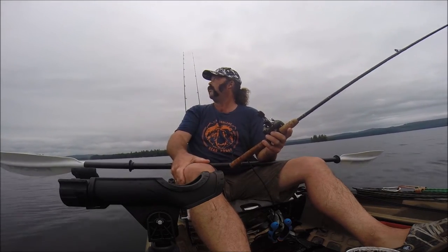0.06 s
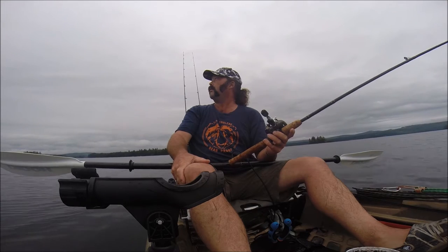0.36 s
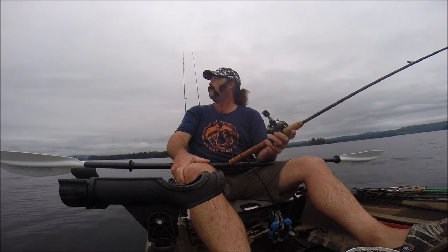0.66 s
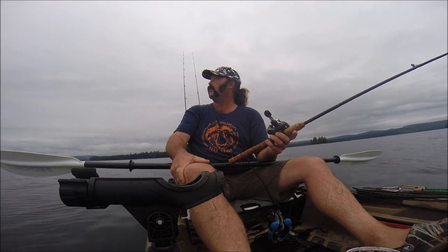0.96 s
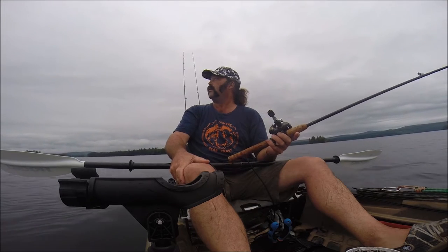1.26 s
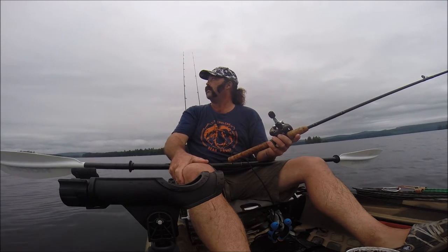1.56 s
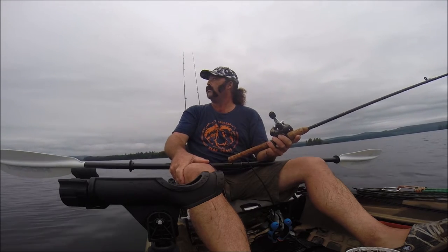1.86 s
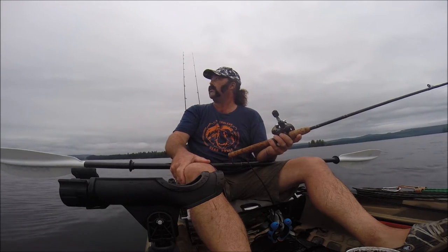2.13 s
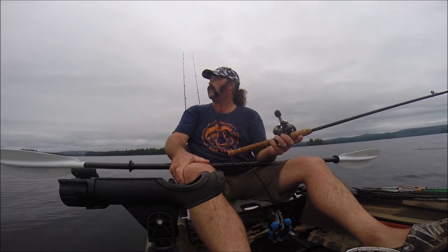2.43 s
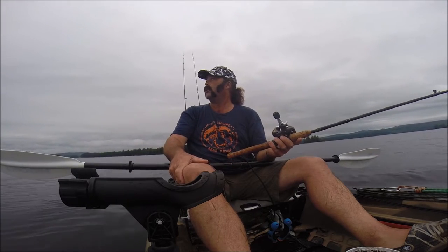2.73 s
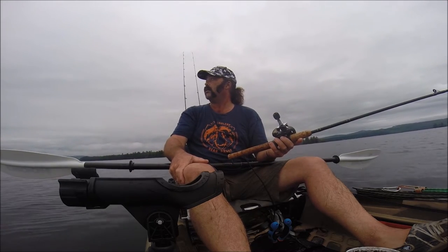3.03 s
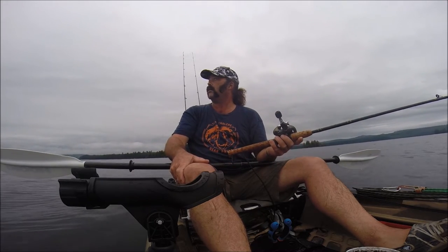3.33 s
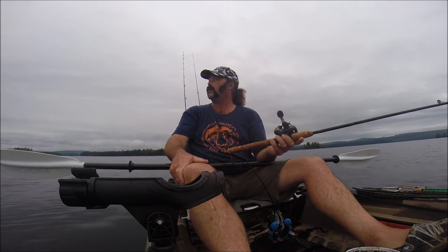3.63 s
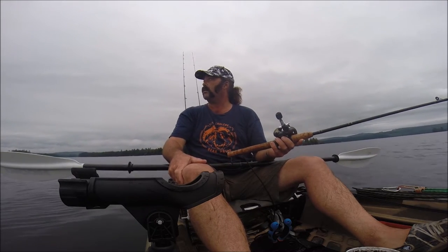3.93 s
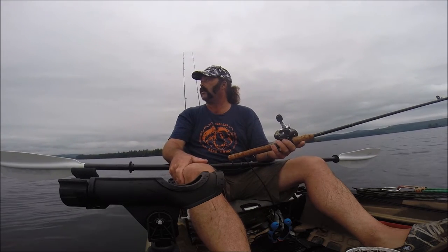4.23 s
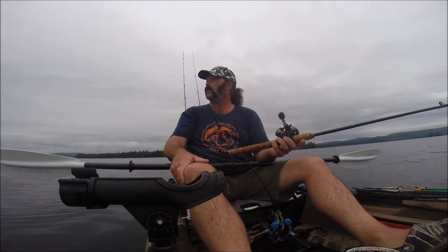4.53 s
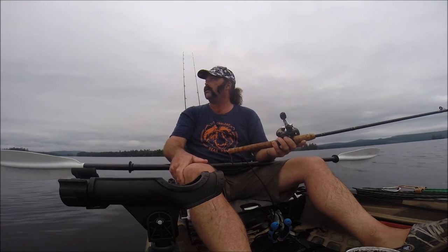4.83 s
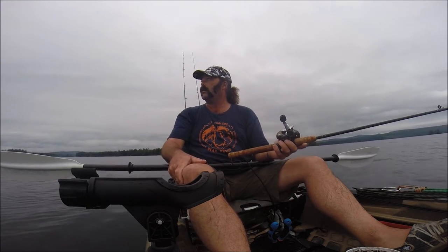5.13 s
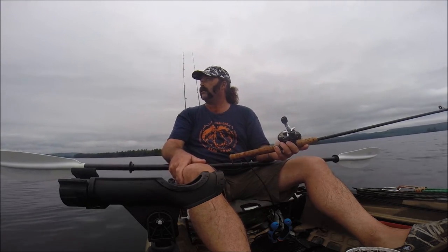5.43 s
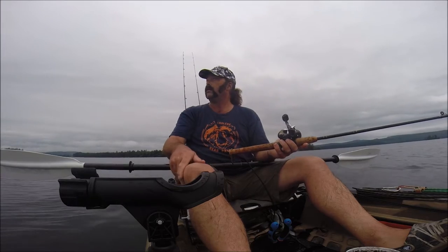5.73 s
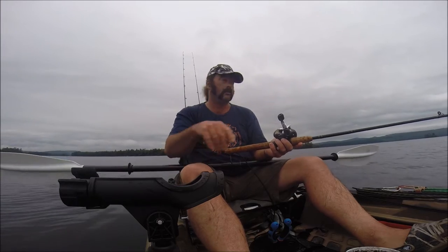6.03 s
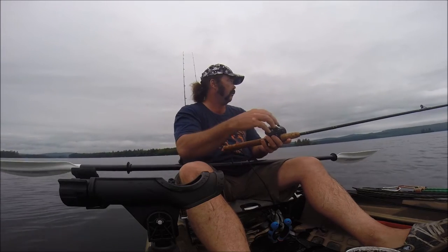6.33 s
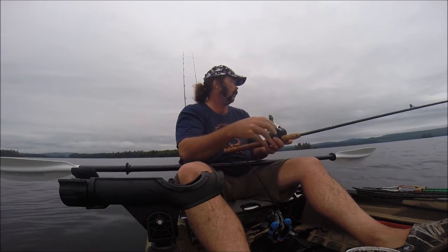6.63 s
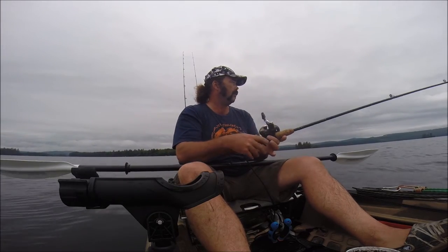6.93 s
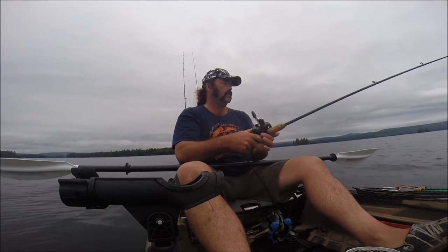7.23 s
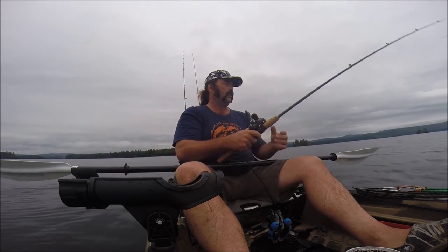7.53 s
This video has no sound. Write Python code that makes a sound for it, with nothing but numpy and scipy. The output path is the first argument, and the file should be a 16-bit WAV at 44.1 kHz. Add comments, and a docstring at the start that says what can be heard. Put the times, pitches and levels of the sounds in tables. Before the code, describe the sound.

A loon's clear, wavering call opens at once over a calm lake, with a faint, dull echo off the shore. A second strong call follows at 1 second, then softer ones near 2, 3, 4.3 and 5.6 seconds, while another loon answers with hoarse low notes and yelps. The calls end at about 6.2 seconds. A fishing reel clicks sharply at 0.5 and 1.5 seconds, and more softly at 6.4. A distant bird chirps very faintly around 2.5 seconds. The hollow kayak hull is bumped softly near 5.2, 6.2 and 7.2 seconds, and the reel whirs faintly from about 6 seconds to the end, near 7.7. Throughout, wind buffets the microphone with low rumble and thumps, surging near 2, 3.3 and 4.3 seconds. Almost everything is on the right; the left carries mostly light hiss.

```python
"""From a kayak on a calm lake, a loon's wavering call is heard at once, echoing off the shore.
A fishing reel clicks, and a second loon trades calls with the first, amid low notes and yelps.
Near 2.5 s a small bird chirps far off. After 5 s the hull is bumped, the reel whirs and the calls end.
All along, a breeze buffets the right microphone. The left one is all but dead:
it gives hiss, a faint whine and a trace of the wind and the other sounds."""
import sys
import numpy as np
from scipy import signal
from scipy.fft import rfft, irfft
from scipy.io import wavfile
from scipy.ndimage import uniform_filter1d

SR = 44100
rng = np.random.default_rng(int(sys.argv[2]) if len(sys.argv) > 2 else 0)


def digitize_waveform(pressure):
    """Quantize a signal to 16-bit integers and store it at the path in sys.argv[1].

    Rows of a 2-D input are taken as channels; values are limited to [-1, 1].
    """
    field = np.atleast_2d(pressure).T
    bounded = np.clip(field, -1, 1)
    quanta = np.round(bounded * 32767).astype(np.int16)
    wavfile.write(sys.argv[1], SR, quanta)


N = 338688
TIME = np.arange(N) / SR


def loon_calls():
    """Two loons sing clear, wavering calls (tremolos), with hoarse low notes and yelps around them."""
    # Each row: start, end and delay to a crest (a top of the waver) in seconds, wavers per second,
    # crest pitch and dip depth in Hz, tiring time in seconds, then in dB: level, opening swell,
    # closing fade, softening in the dips, treble, treble at the end.
    tremolos = [(-.02, 0.651, 0.091, 11.3, 1181, 127.2, 0.32, -26.5, 8.5, 24, 11, 4, -10),
                (0.998, 1.666, .057, 11.38, 1180, 122.7, .36, -30.5, 13, 28.5, 13, 4.5, 10),
                (1.884, 2.58, .027, 9.67, 1182, 170, .14, -44, 0, 5, 3, -20, -20),
                (3.102, 3.793, .01, 11.4, 1177, 106, 0.13, -38, 2.5, 13.5, 3, -21, -21),
                (4.298, 4.984, .046, 11.18, 1166, 104.2, .2, -36.5, 9.5, 7.5, 2, -17, -21),
                (5.568, 6.23, 0.018, 10.45, 1142, 121.8, 0.16, -40.7, 2, 10.5, 1.5, -23, -23)]
    # Low notes lead into a call or answer it. Each row: start, end and delay to a crest in seconds,
    # wavers per second, crest pitch, dip depth, glide and final lift in Hz, level, fade and treble in dB.
    low_notes = [(0.56, 0.664, 0.021, 7.9, 689, 46, 0, 0, -59, -5, -13),
                 (.652, 0.74, .038, 11.4, 933, 250, 0, 0, -56.5, 0, -10),
                 (0.728, 0.899, 0.081, 8.4, 885, 206.3, 1, 140, -55.5, 0.5, -10),
                 (0.956, 1.047, .071, 7.3, 902, 204, -2, -2, -41.5, 30, -8),
                 (1.048, 1.268, 0.071, 9.25, 733, 80.6, -72, -4, -55, -2, -2),
                 (1.773, 1.894, 0.052, 12.2, 754, 75, 2, 94, -54, 6, -19),
                 (2.028, 2.097, .031, 7.6, 760, 83, 0, 0, -53, 1, -20),
                 (2.237, 2.507, 0.093, 10.2, 734, 87.6, -24, 0, -58, -1, -21),
                 (2.981, 3.116, 0.039, 11.8, 711, 61.7, -1, 138, -54.5, -2, -22),
                 (3.163, 3.243, 0.081, 6.1, 896, 224, 0, 0, -53.5, 7, -22),
                 (3.289, 3.34, .063, 6.5, 890, 192, 0, 0, -51.5, 15, -24),
                 (3.495, 3.698, 0.046, 9.3, 747, 96.2, -115, 0, -55.5, -1.5, -14),
                 (4.2, 4.48, .054, 9.9, 751, 79, 24.5, 225, -49, 2.5, -13),
                 (4.517, 4.677, 0.05, 8.2, 796, 154.7, 0, 120, -48.5, 2.5, -17),
                 (4.737, 4.845, 0.06, 8.2, 698, 96.6, -2, 0, -52, -3, -18),
                 (5.53, 5.58, 0.059, 6.7, 759, 165, 0, 0, -57.5, -5, -22)]
    # Each row: start, end and delay to a crest in seconds, crest pitch in Hz, level in dB.
    yelps = [(0.892, 0.963, 0.0103, 1190, -45), (2.104, 2.277, .037, 1108, -47.5),
             (3.238, 3.287, .002, 1090, -50), (3.338, 3.495, 0.00093, 1150, -43),
             (4.482, 4.526, .001, 1085, -46), (4.68, 4.742, .003, 1183, -44.5)]
    clear = [tremolo(*row) for row in tremolos]
    rough = [low_note(*row) for row in low_notes] + [yelp(*row) for row in yelps]
    return (loon_voice(clear, jitter=0.0018, shimmer_db=1.55)
            + loon_voice(rough, jitter=0.011, shimmer_db=2.0))


def tremolo(start, end, crest_s, rate, crest_hz, dip_hz, tiring_s, level_db, swell_db, fade_db,
            throb_db, treble_db, end_treble_db, tired_hz=957, lag_turns=0.2):
    """A full call is loudest on its crests, and sinks and slows as the bird tires."""
    t, progress = span(start, end)
    tired = np.clip(1 - (end - t) / tiring_s, 0, 1) ** 2
    turns = (t - start - crest_s) * rate - lag_turns * tired
    pitch = (crest_hz - dip_hz * dips(turns)) * (1 - tired) + tired_hz * tired
    early, late = (1 - progress) ** 3, progress ** 3
    softening_db = throb_db * dips(turns, linger=1.48) * (1 - tired)
    loud_db = level_db - swell_db * early - fade_db * late - softening_db
    return t, pitch, loud_db, treble_db + (end_treble_db - treble_db) * late


def low_note(start, end, crest_s, rate, crest_hz, dip_hz, glide_hz, lift_hz, level_db, fade_db,
             treble_db, lift_s=0.018, push_db=2.5, steep_hz_per_s=5000):
    """A low note is louder as it climbs, softer as it falls; the voice may break upward at the end."""
    t, progress = span(start, end)
    wavering_hz = crest_hz - dip_hz * dips((t - start - crest_s) * rate)
    pitch = wavering_hz + glide_hz * (progress - 0.5) + lift_hz * np.exp((t - end) / lift_s)
    climbing = np.tanh(np.gradient(pitch) * SR / steep_hz_per_s)
    return t, pitch, level_db - fade_db * progress ** 2 + push_db * climbing, treble_db


def yelp(start, end, crest_s, crest_hz, level_db, wavers_per_s=11, dip_hz=149.3, throb_db=6.5,
         treble_db=-23):
    """The answering bird breaks into its high voice for a scrap of tremolo."""
    t, _ = span(start, end)
    dip = dips((t - start - crest_s) * wavers_per_s)
    return t, crest_hz - dip_hz * dip, level_db - throb_db * dip, treble_db


def dips(turns, linger=1.3):
    """The waver: 0 on a crest, where the voice lingers, 1 in a dip."""
    return ((1 - np.cos(2 * np.pi * turns)) / 2) ** linger


def loon_voice(notes, jitter, shimmer_db, fade_db=4.5):
    """The voice trembles slightly in pitch (jitter) and in strength (shimmer)."""
    tremble = jitter * drift(160)
    fading_db = fade_db * np.array([drift(19) for _ in range(6)])
    return sum(loon_note(*note, tremble, fading_db) for note in notes) * from_db(shimmer_db * drift(39))


def loon_note(t, pitch, loud_db, treble_db, tremble, fading_db, easy_db=-52,
              attack_s=0.011, release_s=0.016):
    """One nearly pure note, made of partials: sine waves at 1 to 6 times its pitch."""
    # How strong a partial is. Each row: frequency in Hz, relative level in dB.
    voice_colour = [(600, -2), (750, -18), (900, -9), (1020, -9), (1180, 9), (1300, -4), (1560, -14.5),
                    (1750, -12), (2050, -26.5), (2300, -21), (3000, -37.5), (3250, -29.5), (3600, -27),
                    (4000, -24), (4300, -25), (4750, -32.5), (5200, -50)]
    samples = np.rint(t * SR).astype(int)
    partial_hz = np.arange(1, 7)[:, None] * pitch * (1 + tremble[samples])
    # Overtones are strong only when the bird faces the boat; each fades on its own over the water.
    high_db = (treble_db + fading_db[:, samples]) * np.clip((partial_hz - 1700) / 400, 0, 1)
    # A low note, when pushed, gains in its octave rather than in its lowest partial.
    low_db = (easy_db - loud_db) * np.clip((1000 - partial_hz) / 150, 0, 1)
    gains = from_db(at_hz(voice_colour, partial_hz) + high_db + low_db)
    gains *= partial_hz < voice_colour[-1][0]
    gains /= np.sqrt(np.sum(gains ** 2, axis=0) / 2)
    voice = np.sum(gains * np.sin(2 * np.pi * np.cumsum(partial_hz, axis=1) / SR), axis=0)
    ramp = np.clip(np.minimum((t - t[0]) / attack_s, (t[-1] - t) / release_s), 0, 1)
    out = np.zeros(N)
    out[samples] = voice * np.sin(np.pi / 2 * ramp) ** 2 * from_db(loud_db)
    return out


def shore(x, ring_s=2.5, build_s=0.085):
    """The wooded shore scatters back a long, dull echo."""
    echo = rng.standard_normal(N) * from_db(-60 * TIME / ring_s) * (1 - np.exp(-TIME / build_s))
    dull = signal.sosfilt(signal.butter(2, [950, 1900], "band", fs=SR, output="sos"), x)
    return signal.fftconvolve(dull, echo / np.linalg.norm(echo))[:N]


def wind(rumble_gain_db=5.5, flutter_gain_db=4.0, lumps_db=3.5, tear_db=-17.5, tear_growth=1.2):
    """Air swirls at the microphone: a deep rumble, a lumpy flutter in the gusts and a few sharp blows."""
    # Each row of these three: frequency in Hz, relative level in dB.
    rumble_colour = [(8.8, -23), (15, 0.5), (48, 2), (78, -3.5), (140, -19.5), (180, -63), (310, -120)]
    flutter_colour = [(70, -9), (110, 3), (150, -2), (200, -10), (300, -22.5), (450, -38.5), (700, -43)]
    tear_colour = [(150, -8), (230, -16), (350, -11), (550, -16), (1000, -34)]
    rumble_db, flutter_db = gusting()
    rumble = from_db(rumble_db + rumble_gain_db) * evened(noise(rumble_colour), span_s=0.0655)
    lumpy_db = flutter_db + lumps_db * drift(21)
    flutter = from_db(lumpy_db + flutter_gain_db) * evened(noise(flutter_colour), span_s=0.0504)
    # Fine swirls grow faster than the gust, so only hard gusts sound bright.
    tearing = from_db(tear_db + tear_growth * lumpy_db) * noise(tear_colour)
    return rumble + flutter + tearing + eddies()


def gusting(lull_flutter_db=-63, attack_s=0.016, release_s=0.024, surge_s=0.029):
    """Breeze, gusts and surges add in power, giving the relative dB of rumble and flutter over time."""
    # The breeze between gusts. Each row: time in seconds, rumble in dB.
    breeze = [(0, -48.5), (.7, -53.5), (1.15, -46), (1.9, -49), (2.6, -56.5), (3.05, -41), (4.2, -51.5),
              (4.55, -47.5), (5.0, -48), (5.8, -49), (6.3, -36), (6.6, -47), (7.68, -38.5)]
    # Gusts rise fast, hold and die away. Each row: start and end in seconds, rumble and flutter in dB.
    gusts = [(0.134, .26, -40.5, -58), (0.365, .45, -37.5, -52.5), (0.967, 0.971, -34, -46.5),
             (1.278, 1.624, -37.5, -51), (1.666, 1.811, -37, -48.5), (1.846, 1.93, -35, -57),
             (1.94, 2.065, -33, -39.5), (2.13, 2.246, -31.5, -40), (2.503, 2.516, -37, -53.5),
             (2.722, 2.85, -33.5, -48.5), (2.922, 3.017, -38, -57), (3.035, 3.134, -36, -36),
             (3.237, 3.431, -35.5, -43), (3.528, 3.65, -40.5, -52.5), (3.708, 3.777, -33, -37),
             (3.924, 3.989, -31.5, -46), (4.052, 4.14, -33, -49), (4.253, 4.381, -32, -39),
             (4.674, 4.872, -36, -42.5), (4.933, 4.958, -39, -48), (5.022, 5.11, -32, -43),
             (5.309, 5.408, -35.5, -45.5), (5.44, 5.526, -33.5, -36.5), (5.593, 5.688, -33.5, -50),
             (6.03, 6.115, -35, -40.5), (6.173, 6.331, -35, -39.5), (6.376, 6.473, -33, -45),
             (6.69, 6.766, -40, -62), (6.814, 6.862, -35.5, -41.5), (6.996, 7.061, -33, -49),
             (7.146, 7.19, -43, -57), (7.28, 7.399, -41.5, -41), (7.47, 7.608, -37.5, -50)]
    # Deep surges inside strong gusts. Each row: time in seconds, peak rumble in dB.
    surges = [(1.967, -25), (3.29, -24.5), (4.264, -23)]
    rumble, flutter = from_db(in_time(breeze)) ** 2, from_db(lull_flutter_db) ** 2
    for start, end, rumble_db, flutter_db in gusts:
        outside = np.maximum((start - TIME) / attack_s, (TIME - end) / release_s)
        shape = np.exp(-np.clip(outside, 0, 20))
        rumble += (from_db(rumble_db) * shape) ** 2
        flutter += (from_db(flutter_db) * shape) ** 2
    for peak_s, db in surges:
        rumble += from_db(db) ** 2 * np.exp(-np.minimum(((TIME - peak_s) / surge_s) ** 2, 20))
    return 10 * np.log10(rumble), 10 * np.log10(flutter)


def eddies(gain_db=5.5, rise_s=0.0053):
    """Single whirls of air hit the microphone with low thumps."""
    # Each row: start in seconds, relative peak level in dB.
    hits = [(1.681, -30), (1.957, -30.5), (2.017, -23), (2.117, -21.5), (3.061, -18.5), (3.264, -23.5),
            (3.292, -25.5), (4.253, -23), (4.788, -27), (4.856, -30.5), (5.432, -27), (5.47, -29.5),
            (6.242, -22.5), (6.296, -25.5), (7.279, -24.5), (7.568, -31)]
    blows = np.zeros(N)
    for start, db in hits:
        age = np.maximum(TIME - start, 0) / rise_s
        blows += from_db(db + gain_db) * age * np.exp(1 - age)
    swirl = evened(noise([(40, -20), (85, 12), (150, -4.5), (300, -25), (700, -49)]), span_s=0.0211)
    return blows * swirl / np.sqrt(2)


def reel_clicks(crack_db=-9, crack_s=0.0029):
    """A catch snaps with a bright crack and sets the reel ringing."""
    # Each row: start in seconds, level in dB, tilt toward the treble in dB per octave,
    # the frequency struck hardest in Hz, its boost in dB.
    clicks = [(0.527, -49, -4, 1790, 11), (0.5609, -32.5, 3, 3470, 11), (1.4675, -31.5, -3, 1320, 5),
              (6.419, -40.5, 2.5, 2820, 11)]
    # The tones of reel and rod. Each row: frequency in Hz, relative level in dB, ring time in seconds.
    reel_tones = [(1070, -32, 0.027), (1270, -5.5, 0.027), (1510, -4.5, 0.019), (1810, -5, 0.018),
                  (2090, -12, 0.015), (2367, -1, 0.018), (2896, -10, 0.04), (3200, -3.5, 0.0076),
                  (3530, -5.5, 0.015), (3800, -2, 0.0065), (4510, -6, 0.022), (5520, -8.5, 0.01),
                  (6570, -6, 0.0034), (8540, -18.5, 0.016)]
    out = np.zeros(N)
    crack = noise([(1500, 0), (3000, 7), (7000, -3), (10000, 1), (15000, -25)])
    for start, db, tilt_db, struck_hz, boost_db in clicks:
        tones = []
        for hz, tone_db, ring_s in reel_tones:
            nearness = np.exp(-(np.log(hz / struck_hz) / 0.075) ** 2)
            tones.append((hz, db + tone_db + tilt_db * np.log2(hz / 3000) + boost_db * nearness, ring_s))
        out += strike(start, tones, chatter_db=-19, chatter_s=0.0037)
        out += from_db(db + crack_db) * crack * (TIME >= start) * np.exp(-np.abs(TIME - start) / crack_s)
    return out


def hull_knocks():
    """Soft bumps ring the hollow hull."""
    # Each row: start in seconds, level in dB.
    knocks = [(5.193, -57), (6.245, -43.5), (7.157, -43.5)]
    # Each row: frequency in Hz, relative level in dB, ring time in seconds.
    hull_tones = [(240, -3, .07), (375, 1, .08), (497, -6.5, 0.04), (690, -2, 0.033), (1200, -15, .025)]
    return sum(from_db(db) * strike(start, hull_tones, chatter_db=-43, chatter_s=0.01)
               for start, db in knocks)


def strike(start, tones, chatter_db, chatter_s):
    """A hit that chatters briefly sets each of an object's tones ringing."""
    out, at, size = np.zeros(N), int(start * SR), SR // 10
    for k, (hz, db, ring_s) in enumerate(tones):
        force = from_db(chatter_db) * rng.standard_normal(size) * np.exp(-TIME[:size] / chatter_s)
        force[0] = (-1) ** k  # neighbouring tones start in opposite directions
        out[at:at + size] += from_db(db) * ring(force, hz, ring_s)
    return out


def ring(force, hz, ring_s):
    """Each push starts a sine wave that dies away by 60 dB in ring_s seconds."""
    decay, angle = from_db(-60 / (ring_s * SR)), 2 * np.pi * hz / SR
    return signal.lfilter([0, np.sin(angle)], [1, -2 * decay * np.cos(angle), decay ** 2], force + 1e-18)


def reel_whir(grain_db=2.5):
    """Hands and line rub on the reel in fine grains."""
    # Each row: time in seconds, level in dB.
    rubbing = [(0, -97), (5.6, -81), (5.95, -66.5), (6.15, -72), (6.3, -65), (6.5, -71), (7.1, -76),
               (7.3, -71), (7.45, -61.5), (7.68, -59)]
    # Each row: frequency in Hz, relative level in dB.
    whir_colour = [(800, -1.5), (1300, -6), (2300, -9), (2750, -0.5), (3250, -9.5), (5000, -15),
                   (9000, -30)]
    return from_db(in_time(rubbing) + grain_db * drift(90)) * noise(whir_colour)


def small_bird():
    """A distant bird gives thin whistles that slide down."""
    # Each row: start and length in seconds, first and last pitch in Hz, level in dB.
    chirps = [(2.474, 0.066, 5200, 3140, -64.5), (2.585, .065, 4400, 3020, -67),
              (2.72, .035, 4250, 3630, -73)]
    out = np.zeros(N)
    for start, length, from_hz, to_hz, db in chirps:
        progress = np.clip((TIME - start) / length, 0, 1)
        pitch = from_hz + (to_hz - from_hz) * progress
        arch = 2 * np.sqrt(progress * (1 - progress))
        out += from_db(db) * arch * np.sqrt(2) * np.sin(2 * np.pi * np.cumsum(pitch) / SR)
    return out


def background(air_db=-63):
    """Open air, and a hollow hum near 1200 Hz where background noise resonates in the camera housing."""
    # Each row: time in seconds, level in dB.
    hum_levels = [(0, -58), (1.7, -55.5), (2.7, -56.5), (2.9, -55.5), (3.9, -61), (5.2, -61), (6.6, -62),
                  (7.68, -70)]
    # Each row of these two: frequency in Hz, relative level in dB.
    hum_colour = [(900, -9.5), (1080, -4.5), (1200, 7), (1290, -4), (1420, -13), (1900, -22.5)]
    air_colour = [(100, -23), (300, -1), (700, -2.5), (1000, -7), (1700, -6), (3000, -14.5), (6000, -28.5)]
    return from_db(air_db) * noise(air_colour) + from_db(in_time(hum_levels)) * noise(hum_colour)


def from_db(db):
    """Turn decibels into a number to multiply by."""
    return 10 ** (np.asarray(db) / 20)


def rms_one(x):
    """Scale a signal to an average power of 1."""
    return x / np.sqrt(np.mean(x ** 2) + 1e-20)


def span(start, end):
    """The times within a note, and its progress from 0 to 1."""
    t = TIME[(TIME >= start) & (TIME < end)]
    return t, (t - start) / (end - start)


def in_time(points):
    """Join (seconds, value) points with straight lines, giving a value at every sample."""
    return np.interp(TIME, *np.transpose(points))


def at_hz(colour, hz):
    """Read the level at any frequency from a colour: a list of (Hz, dB) points."""
    point_hz, db = np.transpose(colour)
    return np.interp(np.log(np.maximum(hz, 1)), np.log(point_hz), db)


def noise(colour):
    """Noise of power 1 that follows a colour and falls away beyond its ends."""
    hz = np.arange(N // 2 + 1) * SR / N + 1
    roll_off = 1 / (1 + (hz / colour[-1][0] / 2) ** 4) / (1 + (colour[0][0] / hz / 2) ** 4)
    return rms_one(irfft(rfft(rng.standard_normal(N)) * from_db(at_hz(colour, hz)) * roll_off, N))


def drift(rate_hz):
    """A random wander of typical size 1, mostly slower than rate_hz."""
    hz = np.arange(N // 2 + 1) * SR / N
    return rms_one(irfft(rfft(rng.standard_normal(N)) / (1 + (hz / rate_hz) ** 2), N))


def evened(x, span_s):
    """Take the chance swells out of a noise."""
    return x / np.sqrt(uniform_filter1d(x ** 2, int(span_s * SR)) + 1e-4)


def scene(echo_db=-25, leak_db=-40, wind_leak_db=-33):
    """All sound reaches the right microphone; only a trace gets into the left."""
    loons = loon_calls()
    echo = from_db(echo_db) * shore(loons)
    sound = loons + echo + small_bird() + reel_clicks() + hull_knocks() + reel_whir() + background()
    breeze = wind()
    return np.array([from_db(leak_db) * sound + from_db(wind_leak_db) * breeze, sound + breeze])


def record(dry, hiss_db=-56.0, cutoff_hz=15300):
    """The electronics add hiss to each channel and a thin whine to both; the highest treble is cut."""
    # Each row: frequency in Hz, relative level in dB.
    hiss_colour = [(20, 3), (70, -8), (140, -8.5), (280, -13), (560, -20), (1100, -27.5), (2200, -29.5),
                   (4500, -32), (9000, -33.5), (15000, -35)]
    # Each row: frequency in Hz, level in dB.
    whine_tones = [(2937, -84.5), (5844, -85.5), (5874, -92), (8781, -85), (11688, -87.5), (11718, -88),
                   (14625, -83.5)]
    hiss = from_db(hiss_db) * np.array([noise(hiss_colour), noise(hiss_colour)])
    whine = sum(from_db(db) * np.sqrt(2) * np.sin(2 * np.pi * (hz * TIME + rng.random()))
                for hz, db in whine_tones)
    treble_cut = signal.ellip(12, 0.2, 80, cutoff_hz, fs=SR, output="sos")
    return signal.sosfilt(treble_cut, dry + hiss + whine)


dry = scene()
out = record(dry)
digitize_waveform(out)
```